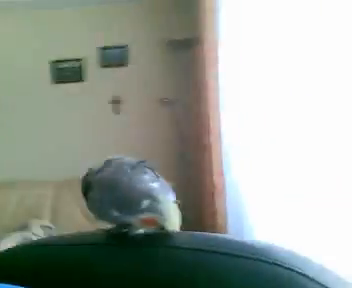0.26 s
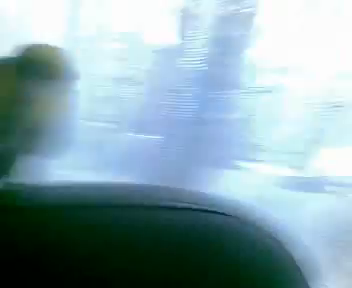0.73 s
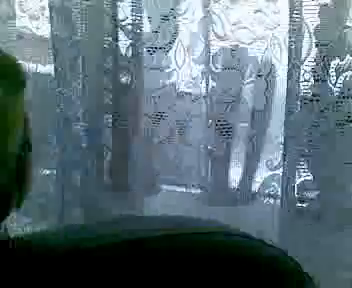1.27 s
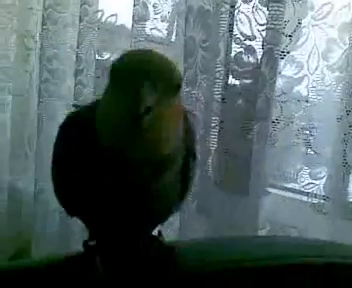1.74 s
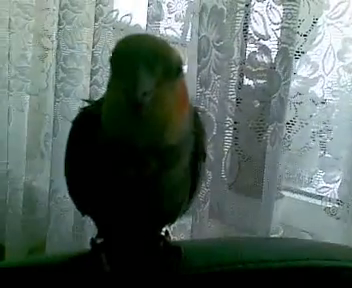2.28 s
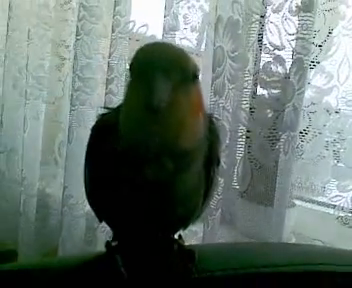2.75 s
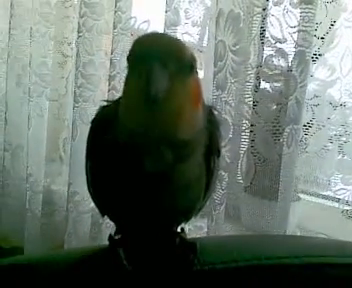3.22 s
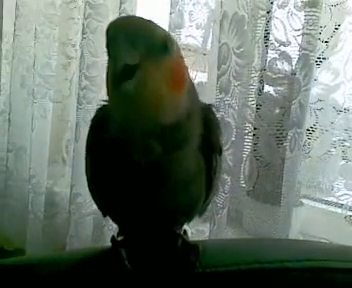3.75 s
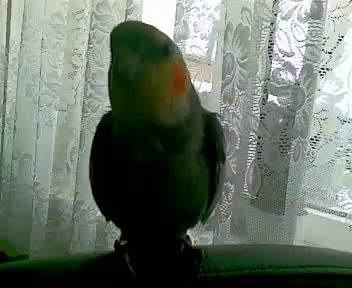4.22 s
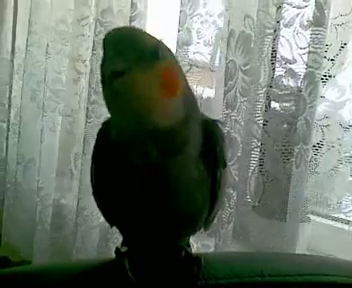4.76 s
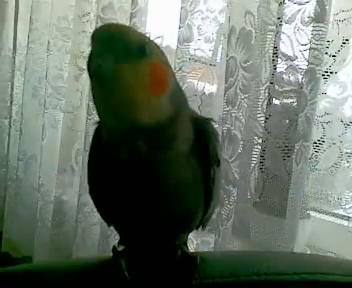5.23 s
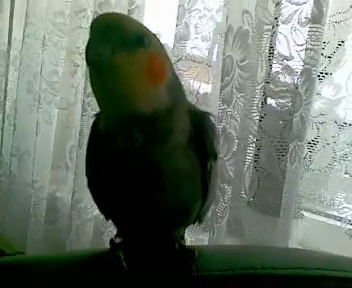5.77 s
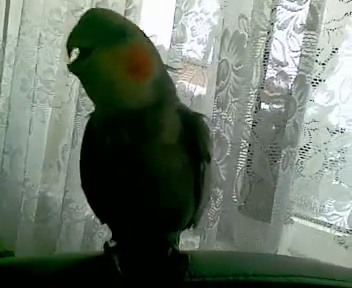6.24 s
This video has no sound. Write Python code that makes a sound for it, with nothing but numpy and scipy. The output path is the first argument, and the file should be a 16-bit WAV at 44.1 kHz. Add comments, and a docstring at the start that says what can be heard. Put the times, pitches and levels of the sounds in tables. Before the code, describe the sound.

A cockatiel whistles close by in a living room, repeating one quick tune: two bright chirps, a rising slur, a faint low toot and a soft note that rises and falls. The phrase comes round about every 0.8 seconds, three times from the start, and breaks off on a single chirp at 2.4 seconds. A tiny beak click falls near 1.3 seconds. After a pause, the bird gives a quiet, raspy nasal squawk at about 3.7 seconds. Around 4 seconds a second bird calls once from further off, a wavering, echoing whistle, just as the first starts again with a loud upward slur. Three more phrases follow, ending on a chirp at about 6.4 seconds. The room rings briefly after every note. Faint low room noise, a household hum and a few soft low bumps lie underneath.

```python
"""In a living room, a cockatiel close by on a chair back whistles one little tune over and over:
two bright chirps, a rising slur, a low toot and a soft arch. Its breath shakes a membrane in its
voice organ, and throat and beak colour the tone. It pauses, gives a quiet nasal squawk and starts
again as a second bird calls once from further off. The room rings after every note, and faint
room noise, a household hum and a few soft low bumps lie underneath."""
import sys
import numpy as np
from scipy import signal
from scipy.fft import rfft, irfft
from scipy.io import wavfile
from scipy.ndimage import uniform_filter1d

SR = 44100
rng = np.random.default_rng(int(sys.argv[2]) if len(sys.argv) > 2 else 0)


def unload_wav(signal):
    """Save mono or channel-first audio to the path in sys.argv[1] as 16-bit WAV at rate SR, clipped to [-1, 1]."""
    wavfile.write(
        sys.argv[1],
        SR,
        np.round(np.clip(np.atleast_2d(signal).T, -1, 1) * 32767).astype(np.int16),
    )


N = 286209
TIME = np.arange(N) / SR

# Bright chirps, mostly in pairs. Each row: start and length in seconds, top pitch in Hz, level in dB,
# then the second and third harmonics in dB against the first, before the voice shapes them.
CHIRP_NOTES = [(.1185, 0.045, 2404, -24, -3, 2), (.2872, .052, 2429, -23.5, -6.5, 0),
               (.8757, 0.04506, 2448, -20.5, 8.5, 4.5), (1.0357, 0.04214, 2454, -17, 5, 9),
               (1.6477, 0.04654, 2408, -18.5, 1, -8), (1.8151, 0.0429, 2431, -21, 2.5, 1),
               (2.4203, 0.0462, 2388, -20, 4, -2), (4.1388, 0.04566, 2528, -17, 8, 4.5),
               (4.3019, .046, 2520, -17.5, 5.5, 3), (4.8969, 0.04534, 2436, -22, 4, 2.5),
               (5.0611, 0.03983, 2516, -19.5, 3.5, 4), (5.6601, 0.0475, 2440, -23.5, 2.5, -2.5),
               (5.8261, 0.03943, 2466, -23, 3.5, 3), (6.4293, 0.0435, 2485, -22.5, -0.5, -1.5)]
# Rising slurs; the one after the pause climbs to chirp height. Each row reads like a chirp's.
SLUR_NOTES = [(.448, .103, 1807, -28, 3, -12.5), (1.2, 0.1021, 1881, -26, 4, -0.5),
              (1.9859, 0.1012, 1927, -29, 3, -5), (3.95, .087, 2379, -16, 2.5, -5),
              (4.4557, .108, 1846, -28.5, 1.5, -2), (5.2187, 0.1019, 1860, -31, 1.5, -3.5),
              (5.9873, 0.1006, 1840, -32.5, 2.5, -3.5)]
# Low toots, all on one pitch. Each row: start in seconds, length in seconds, level in dB.
TOOT_NOTES = [(0.608, 0.0848, -47), (1.359, 0.0512, -49.5), (2.143, 0.081, -54), (4.615, 0.0555, -41.5),
              (5.369, 0.063, -46.5), (6.156, 0.046, -46)]
# Soft notes that rise and fall in an arch. Each row reads like a chirp's.
ARCH_NOTES = [(-.07, 0.1225, 2237, -29.5, -33, -19), (.684, 0.1331, 2224, -27, -35, -23),
              (1.459, 0.1178, 2237, -24.5, -30.5, -27.5), (2.229, .117, 2226, -29, -26, -21.5),
              (4.711, 0.1169, 2214, -28.5, -26.5, -15.5), (5.468, .121, 2249, -29.5, -27.5, -19),
              (6.253, 0.1147, 2204, -30.5, -27.5, -20)]
# How throat and beak pass a whistle's overtones. Each row: frequency in Hz, boost or cut in dB.
OVERTONE_SHAPE = [(2600, -4), (2950, -4), (3300, 8), (3700, 4), (4950, 2.5), (5500, 0.5), (6300, -9),
                  (6800, -14), (7300, -21.5), (9500, -32.5)]
# The squawk, a fall and then a small arch. Each row: time in seconds, pitch in Hz, level in dB.
SQUAWK_PATH = [(3.641, 997.6, -53.5), (3.663, 924.6, -39.5), (3.679, 745.2, -46.5), (3.715, 742.8, -40.5),
               (3.758, 675.5, -48.5), (3.78, 704.7, -57.5), (3.797, 769.7, -39), (3.815, 853, -41),
               (3.838, 675, -44.5)]
# How the throat colours the squawk. Each row: frequency in Hz, boost or cut in dB.
THROAT_SHAPE = [(700, 1), (1500, 8), (2300, 3.5), (3000, -9), (3700, -40.5), (4500, -9), (5100, -13.5),
                (6000, -44.5), (7500, -41)]
# The second bird's answer. Each row: time in seconds, pitch in Hz, relative level in dB.
FAR_CALL_PATH = [(3.829, 1510, -55.5), (3.954, 1671, -50.5), (4.01, 1779, -33), (4.057, 2032, -31.5),
                 (4.085, 1891, -32), (4.128, 1558, -43)]
# How far off the near bird is. Each row: time in seconds, relative distance (more gives more echo).
BIRD_DISTANCE = [(0, 1.86), (.55, 1.424), (.85, 0.693), (2.4, 0.927), (4.2, 0.992), (6.49, 1.81)]
# How the room rings. Each row: frequency in Hz, seconds to fade by 60 dB, echo level in dB.
ROOM_RING = [(297.67, .55, -17), (1340, 0.63, -5), (1960, 0.39, -9.5), (2410, .5, -12.5),
             (3580, 0.3688, -9), (4950, 0.3686, -15), (7050, 0.27, -10.5)]
# The colour of the room noise. Each row: frequency in Hz, relative strength in dB.
NOISE_COLOUR = [(15, -34), (25, -6.5), (44, 1.5), (60, -18), (149, -8.5), (364, -10), (487, -9), (562, -13),
                (1000, -11), (1550, -16), (1750, -17.5), (2280, -26), (7090, -27.5), (8000, -44),
                (10400, -82.5), (17600, -120)]
# The loudness of the room noise. Each row: time in seconds, relative level in dB.
NOISE_LEVELS = [(0, -72), (2.8, -74), (3.5, -68), (4.5, -67), (6.49, -72)]
# The tones of the hum. Each row: frequency in Hz, relative level in dB.
HUM_TONES = [(32.3, -79.5), (150.7, -86.5), (802.1, -82.5), (974.4, -86.5), (1410, -85), (1690, -78)]
# Soft low bumps. Each row: time of the peak in seconds, rough length in seconds, level in dB.
LOW_BUMPS = [(1.005, 0.31, -62.5), (1.742, 0.141, -58), (2.134, 0.0295, -62), (4.175, .024, -47),
             (4.334, .045, -56.5), (5.057, 0.38, -70)]

# How each kind of note moves in pitch. Hold and crest are shares of its length, drop is a share
# of its top pitch, and a higher bend gives a flatter top.
CHIRP_GLIDE = dict(start_hz=1738, hold=0, crest=.66, rise_bend=1.8, drop=.075, fall_bend=2.916)
SLUR_GLIDE = dict(start_hz=1314, hold=.35, crest=.92, rise_bend=1.8, drop=.087, fall_bend=3.1)
TOOT_GLIDE = dict(start_hz=1327, hold=0, crest=.1, rise_bend=1, drop=.0074, fall_bend=.972)
ARCH_GLIDE = dict(start_hz=1413, hold=.01, crest=.68, rise_bend=2.1, drop=.5, fall_bend=2.8)
# Each kind's voice. Swell is the gain per octave climbed, jitter shakes the pitch, flutter shakes
# the level, and fourth sets the fourth harmonic against the third.
CHIRP_VOICE = dict(attack_s=.004653, release_s=.005, swell_db=18.5,
                   jitter=.0034, flutter_db=2.1555, fourth_db=-20.5)
SLUR_VOICE = dict(attack_s=.0067, release_s=.0044, swell_db=29.5,
                  jitter=.009, flutter_db=3.26, fourth_db=3.5)
TOOT_VOICE = dict(attack_s=.004, release_s=.015, swell_db=25, jitter=.006, flutter_db=2.5, fourth_db=-11)
ARCH_VOICE = dict(attack_s=.0033, release_s=.006, swell_db=26.5, jitter=.005, flutter_db=3, fourth_db=-7)
TOOT_HZ, TOOT_SECOND_DB, TOOT_THIRD_DB = 1266.9, 1, -9.5
# Low, gentle whistling is purer: harmonics two, three and four are cut by up to these amounts.
PURE_BELOW_HZ, PURE_EDGE_HZ, PURE_CUTS_DB = 1580.3, 95, (-17, -36.5, -36.5)
RASP_AT_ONSET, RASP_DECAY_S, RASP_LEFT = 1, .029, .3   # the squawk starts harsh and clears
BEAK_OPEN_HZ, BEAK_CLOSED_HZ = 1937, 1520   # the beak's resonance sinks as it closes


def whistles(notes, course, attack_s, release_s, swell_db, jitter, flutter_db, fourth_db):
    """Each note is one push of effort: it gets louder and richer as its pitch climbs."""
    out = np.zeros(N)
    for start, length, top_hz, db, second_db, third_db in notes:
        now = (TIME >= start) & (TIME < start + length)
        t = TIME[now] - start
        hz = glide(t / length, top_hz, **course)
        phase = membrane_phase(hz, jitter)
        loudness_db = db + swell_db * np.log2(hz / top_hz)
        purity = 1 / (1 + np.exp((hz - PURE_BELOW_HZ) / PURE_EDGE_HZ))   # 1 when low, 0 when high
        overtones = zip([second_db, third_db, third_db + fourth_db], PURE_CUTS_DB)
        harmonics_db = [0]
        for k, (own_db, cut_db) in enumerate(overtones, 2):
            harmonics_db.append(own_db + cut_db * purity + at_hz(OVERTONE_SHAPE, k * hz)[0])
        tone = 0
        for k, harmonic_db in enumerate(harmonics_db, 1):
            wobble_db = flutter_db * drift(200, len(t))
            tone += from_db(loudness_db + harmonic_db + wobble_db) * np.sin(k * phase)
        fade = np.clip(np.minimum(t / attack_s, (length - t) / release_s), 0, 1)
        out[now] += tone * fade
    return out


def glide(progress, top_hz, start_hz, hold, crest, rise_bend, drop, fall_bend):
    """The pitch through one note: it waits, slides to the crest, then drops."""
    to_climb = np.clip((crest - progress) / (crest - hold), 0, 1) ** rise_bend
    fallen = np.clip((progress - crest) / (1 - crest), 0, 1) ** fall_bend
    return top_hz - (top_hz - start_hz) * to_climb - top_hz * drop * fallen


def membrane_phase(hz, jitter):
    """Where the vibrating membrane is in its cycle; its pitch glides smoothly and trembles a little."""
    trembling_hz = uniform_filter1d(hz, size=130) * (1 + jitter * drift(600, len(hz)))
    return 2 * np.pi * np.cumsum(trembling_hz) / SR


def squawk(beak_db, beak_width_hz, uneven, jitter, hiss):
    """A buzz shaped by throat and beak. Rasp makes its cycles strong and weak in turn, and adds hiss."""
    start, end = SQUAWK_PATH[0][0], SQUAWK_PATH[-1][0]
    now = (TIME > start) & (TIME < end)
    hz, db = at_time(SQUAWK_PATH, TIME[now])
    rasp = RASP_LEFT + RASP_AT_ONSET * np.exp(-(TIME[now] - start) / RASP_DECAY_S)
    phase = membrane_phase(hz * (1 + jitter * rasp * drift(2700, len(hz))), jitter=.01)
    k = np.arange(1, 10)[:, None]   # nine harmonics, one per row
    beak_hz = np.linspace(BEAK_OPEN_HZ, BEAK_CLOSED_HZ, len(hz))
    beak_boost_db = beak_db / (1 + ((k * hz - beak_hz) / beak_width_hz) ** 2)
    gains = from_db(at_hz(THROAT_SHAPE, k * hz)[0] + beak_boost_db)
    buzz = (gains * np.sin(k * phase)).sum(0) / np.sqrt((gains ** 2).sum(0) / 2)
    breath = dull_noise(len(hz), edge_hz=220, order=1)
    roughness = uneven * np.sin(phase / 2) + hiss * breath
    out = np.zeros(N)
    out[now] = from_db(db) * buzz * (1 + rasp * roughness)
    return out


def beak_click(at_s, db, decay_s, dull_hz):
    """The beak snaps once: a tiny burst of noise that dies at once."""
    since = np.maximum(TIME - at_s, 0)
    return from_db(db) * (since > 0) * np.exp(-since / decay_s) * dull_noise(N, dull_hz, order=2)


def far_call(jitter, second_db, third_db, brightening, valve_s):
    """A wavering whistle swells, arches over and falls; its overtones only come out when it is loud."""
    hz, db = at_time(FAR_CALL_PATH, TIME)
    phase = membrane_phase(hz, jitter)
    overtones = from_db(second_db) * np.sin(2 * phase) + from_db(third_db) * np.sin(3 * phase)
    tone = np.sin(phase) + from_db(brightening * (db - db.max())) * overtones
    start, end = FAR_CALL_PATH[0][0], FAR_CALL_PATH[-1][0]
    air_valve = np.clip(np.minimum(TIME - start, end - TIME) / valve_s, 0, 1)   # 0 shut, 1 open
    return from_db(db) * tone * air_valve


def living_room(sound, first_echo_s, build_s):
    """Echoes from the walls build up after the sound and die away, the highest ones first."""
    t = TIME[:SR]
    hz = np.arange(SR // 2 + 1.)
    noise_spectrum = rfft(rng.standard_normal(SR))
    build_up = np.clip((t - first_echo_s) / build_s, 0, 1)
    edges_hz = np.geomspace(200, 10000, 18)
    echoes = 0
    for low, high in zip(edges_hz, edges_hz[1:]):
        ring_s, db = at_hz(ROOM_RING, np.sqrt(low * high))
        band = irfft(noise_spectrum * ((hz >= low) & (hz < high)), SR)
        tail = unit_power(band * build_up * from_db(-60 * t / ring_s))
        echoes += from_db(db) * tail * np.sqrt(2 * (high - low)) / SR   # wider bands hold more energy
    return signal.fftconvolve(sound, echoes)[:N]


def room_noise(gain_db):
    """A soft, low rush that swells a little midway."""
    colour_db, = at_hz(NOISE_COLOUR, np.arange(N // 2 + 1) * SR / N)
    level_db, = at_time(NOISE_LEVELS, TIME)
    rush = irfft(rfft(rng.standard_normal(N)) * from_db(colour_db), N)
    return from_db(level_db + gain_db) * unit_power(rush)


def household_hum(gain_db, waver_hz):
    """A few faint tones, each wavering in pitch on its own."""
    hum = 0
    for hz, db in HUM_TONES:
        phase = 2 * np.pi * np.cumsum(hz + waver_hz * drift(34, N)) / SR
        hum += from_db(db + gain_db) * np.sqrt(2) * np.sin(phase)
    return hum


def low_bumps(dull_hz):
    """Each bump is a short swell of dull rumble."""
    swells = sum(from_db(db) * np.exp(-(2 * (TIME - peak_s) / length) ** 2)
                 for peak_s, length, db in LOW_BUMPS)
    return swells * dull_noise(N, dull_hz, order=2)


def from_db(db):
    """Turn decibels into a number to multiply by."""
    return 10 ** (np.asarray(db) / 20)


def unit_power(x):
    """Scale a signal so its average power is one."""
    return x / np.sqrt(np.mean(x ** 2) + 1e-20)


def at_time(rows, seconds):
    """Look up a table by time, drawing straight lines between its rows."""
    times, *columns = np.transpose(rows)
    return [np.interp(seconds, times, column) for column in columns]


def at_hz(rows, hz):
    """Look up a table by frequency, giving every octave the same width."""
    row_hz, *columns = np.transpose(rows)
    return [np.interp(np.log(hz + .00083), np.log(row_hz), column) for column in columns]


def drift(rate_hz, size):
    """A random wander that heads for a new value rate_hz times a second."""
    points = rng.standard_normal(int(size / SR * rate_hz) + 3)
    return np.interp(np.arange(size) / SR * rate_hz, np.arange(len(points)), points)


def lowpass(x, edge_hz, order):
    """Turn down everything above edge_hz; a higher order cuts more sharply."""
    return signal.sosfilt(signal.butter(order, edge_hz, fs=SR, output="sos"), x)


def dull_noise(size, edge_hz, order):
    """Noise with its highs turned down, at a power of one."""
    return unit_power(lowpass(rng.standard_normal(size), edge_hz, order))


def scene():
    """The near bird is heard mostly directly, the far one mostly as echo, over a quiet background."""
    toots = [(start, length, TOOT_HZ, db, TOOT_SECOND_DB, TOOT_THIRD_DB)
             for start, length, db in TOOT_NOTES]
    near = (whistles(CHIRP_NOTES, CHIRP_GLIDE, **CHIRP_VOICE)
            + whistles(SLUR_NOTES, SLUR_GLIDE, **SLUR_VOICE)
            + whistles(toots, TOOT_GLIDE, **TOOT_VOICE)
            + whistles(ARCH_NOTES, ARCH_GLIDE, **ARCH_VOICE)
            + beak_click(at_s=1.287, db=-36.5, decay_s=.00094, dull_hz=4490)
            + squawk(beak_db=9, beak_width_hz=260, uneven=.9, jitter=.04, hiss=.45))
    far = far_call(jitter=.03, second_db=-7, third_db=-14.5, brightening=.75, valve_s=.00067)
    distance, = at_time(BIRD_DISTANCE, TIME)
    echoes = living_room(near * distance + from_db(13.5) * far, first_echo_s=.0014, build_s=.012)
    background = room_noise(gain_db=4.5) + household_hum(gain_db=-1, waver_hz=2) + low_bumps(dull_hz=190)
    return (near + from_db(-1) * far + echoes + background)[None]


def record(dry):
    """A digital converter cuts the highest treble and mirrors a trace of it above half its rate."""
    converter_hz, cutoff_hz = 16000, 8750
    dulled = lowpass(dry, edge_hz=7410, order=48)
    mirrored = dulled * (1 + from_db(-15.5) * np.cos(2 * np.pi * converter_hz * TIME))
    steep_cut = signal.ellip(12, .1, 90, cutoff_hz, fs=SR, output="sos")
    return signal.sosfilt(steep_cut, mirrored)


dry = scene()
out = record(dry)
unload_wav(out)
```